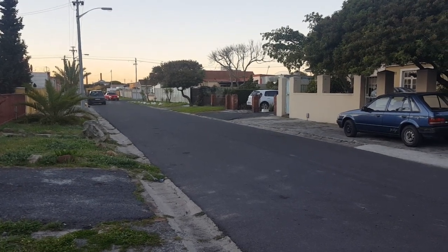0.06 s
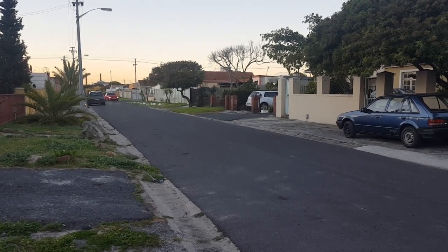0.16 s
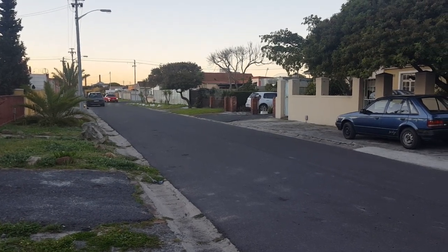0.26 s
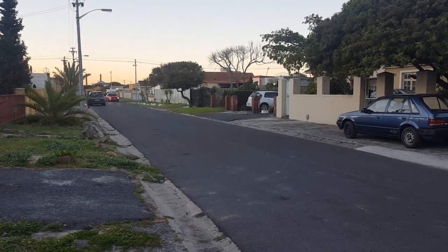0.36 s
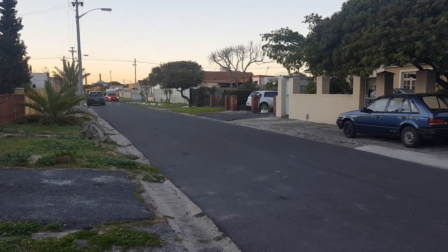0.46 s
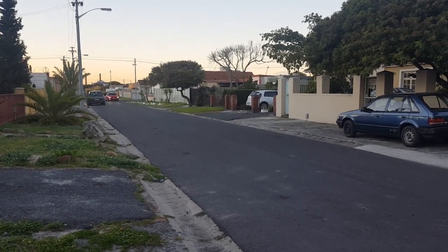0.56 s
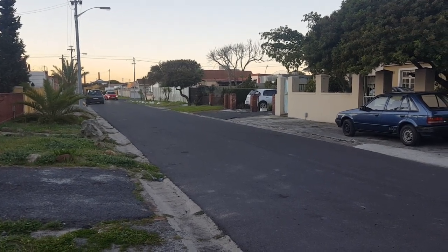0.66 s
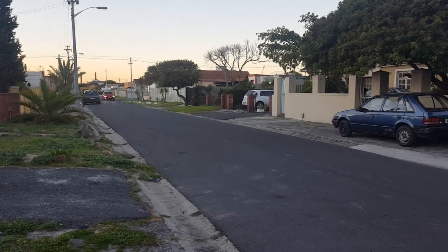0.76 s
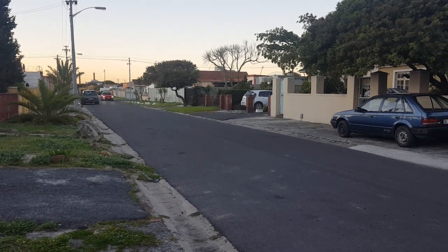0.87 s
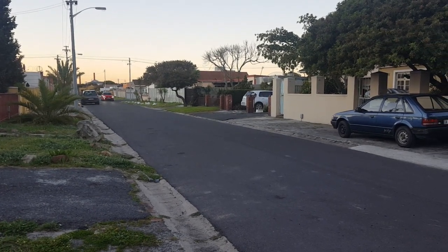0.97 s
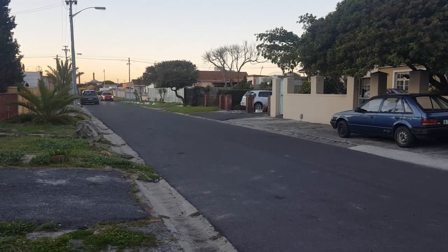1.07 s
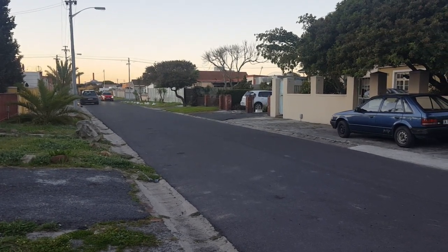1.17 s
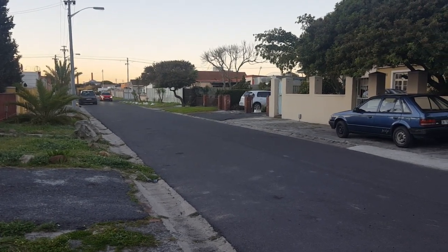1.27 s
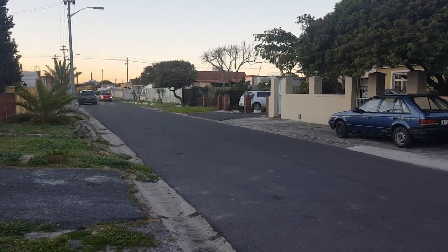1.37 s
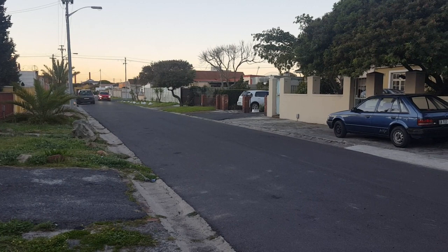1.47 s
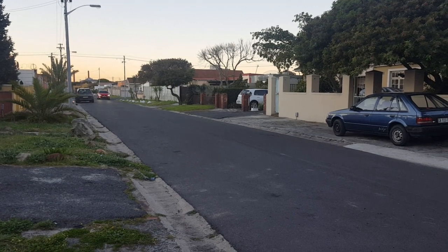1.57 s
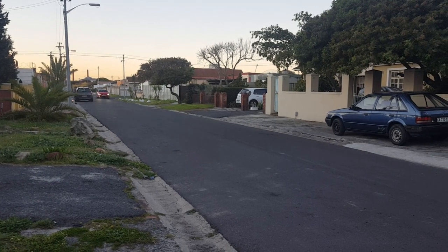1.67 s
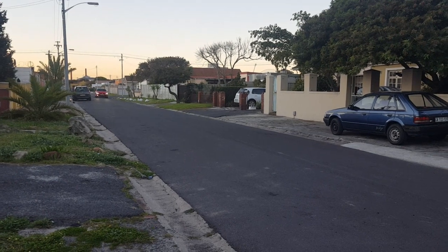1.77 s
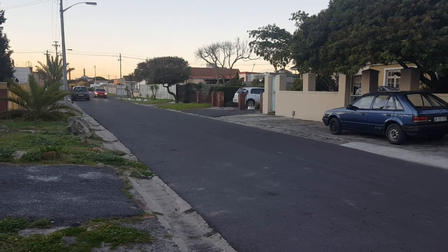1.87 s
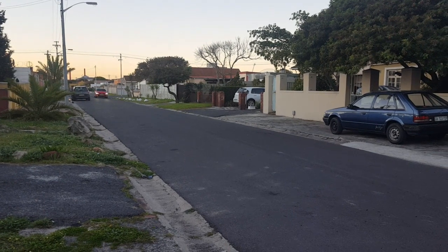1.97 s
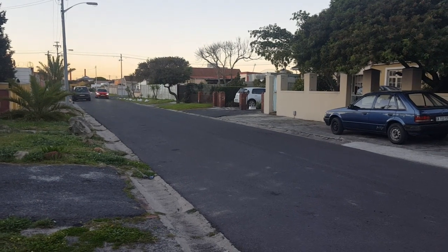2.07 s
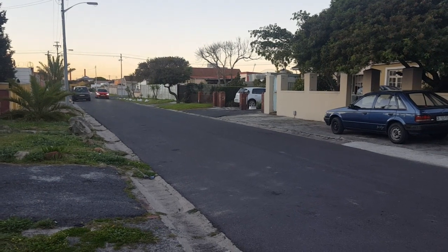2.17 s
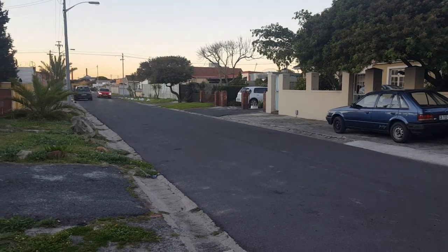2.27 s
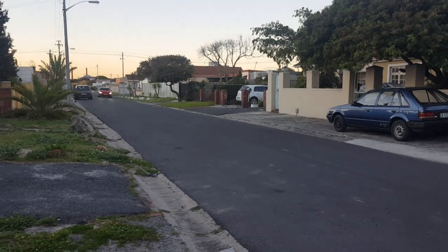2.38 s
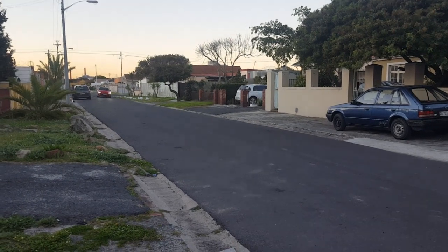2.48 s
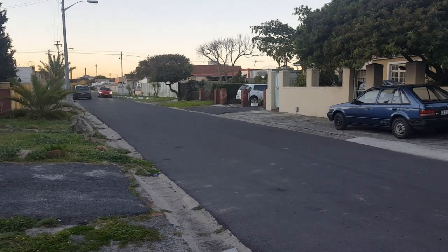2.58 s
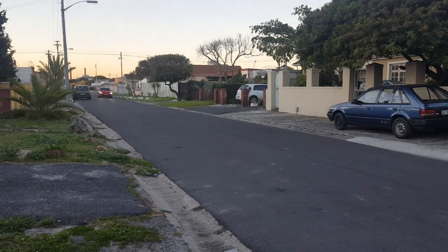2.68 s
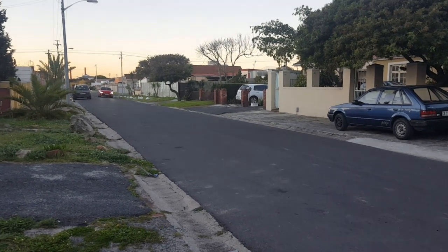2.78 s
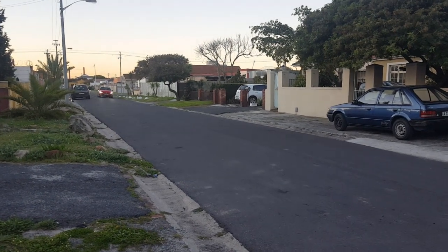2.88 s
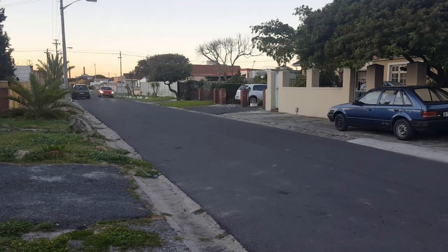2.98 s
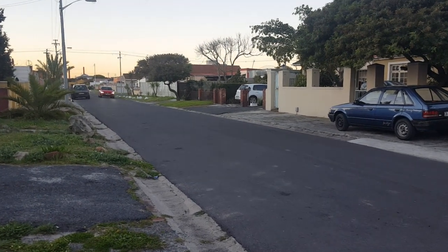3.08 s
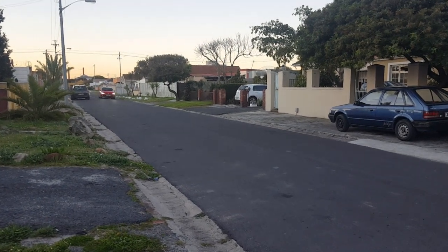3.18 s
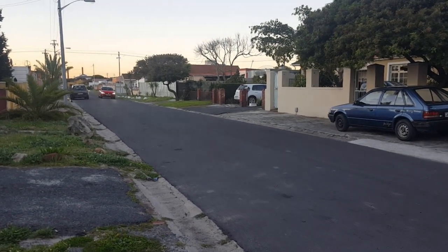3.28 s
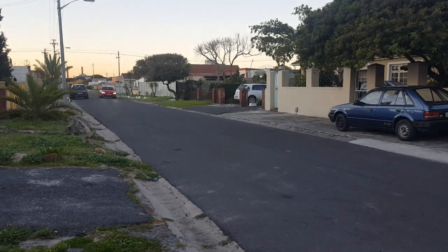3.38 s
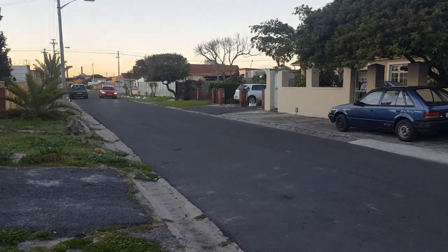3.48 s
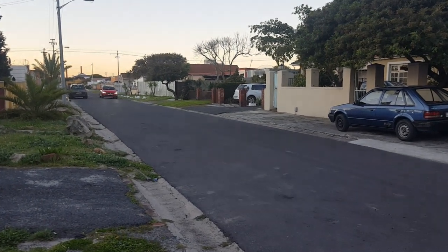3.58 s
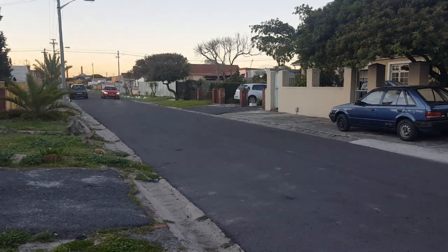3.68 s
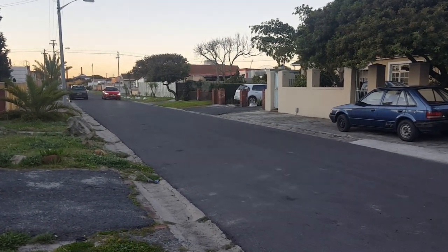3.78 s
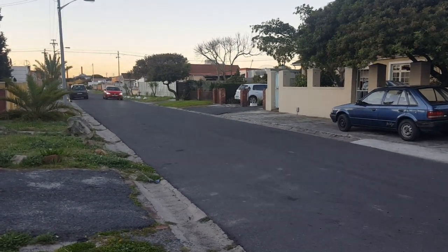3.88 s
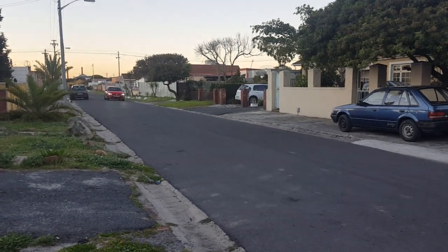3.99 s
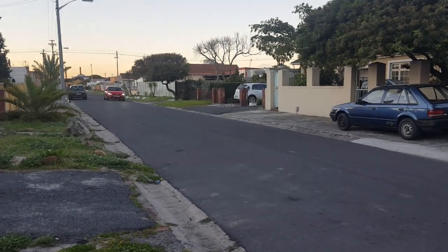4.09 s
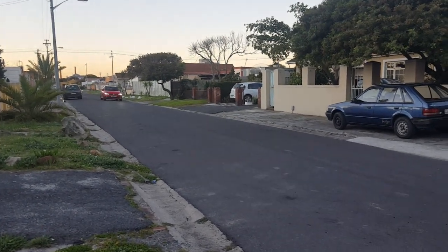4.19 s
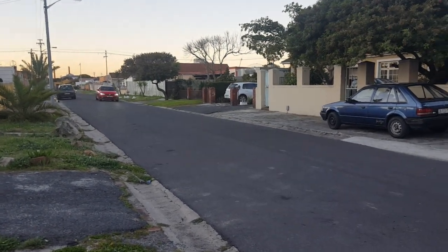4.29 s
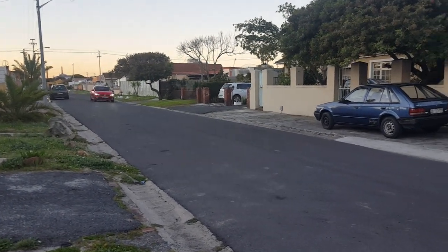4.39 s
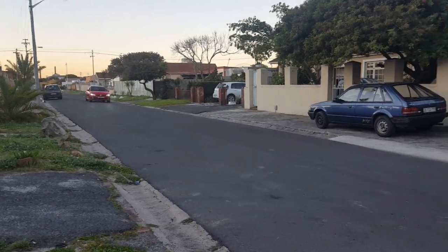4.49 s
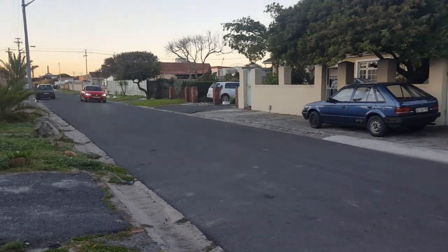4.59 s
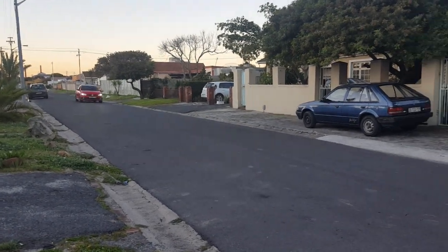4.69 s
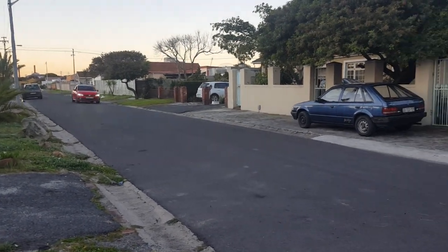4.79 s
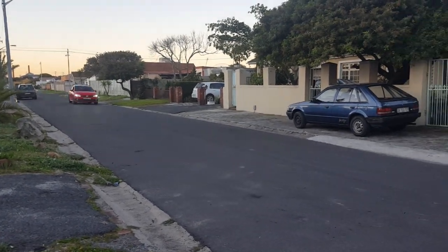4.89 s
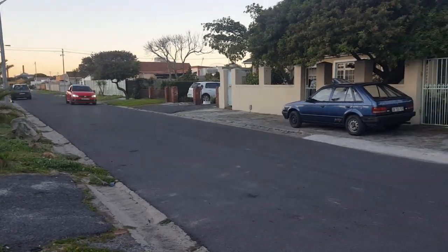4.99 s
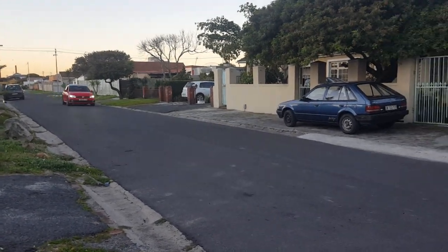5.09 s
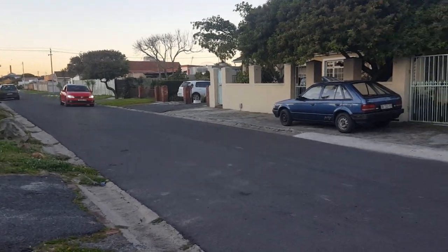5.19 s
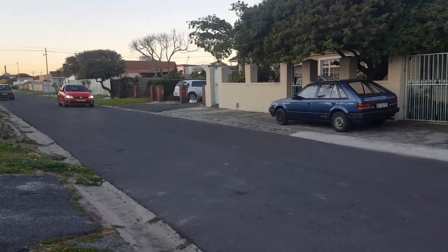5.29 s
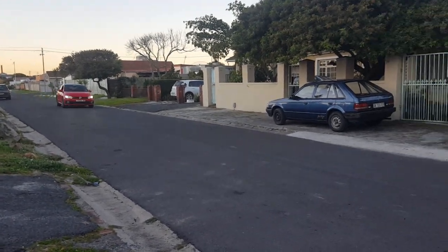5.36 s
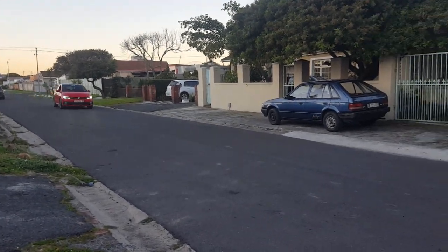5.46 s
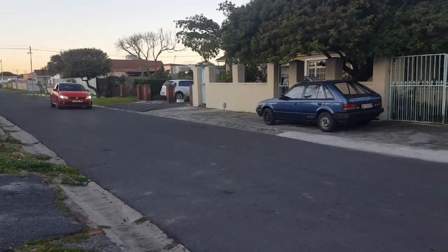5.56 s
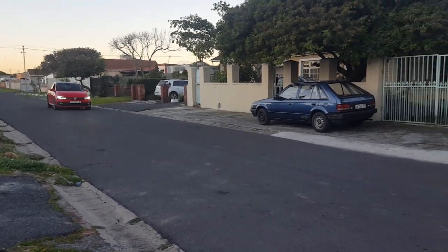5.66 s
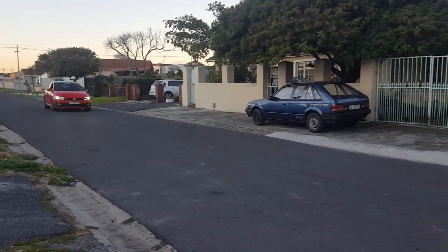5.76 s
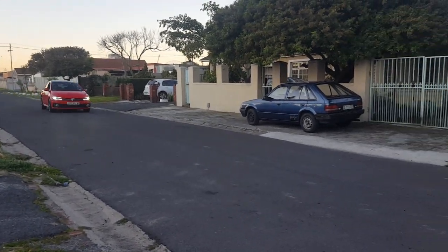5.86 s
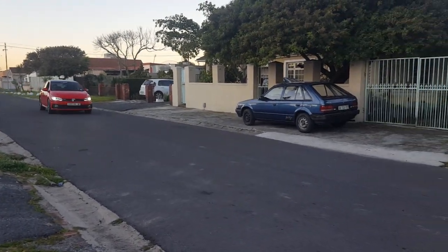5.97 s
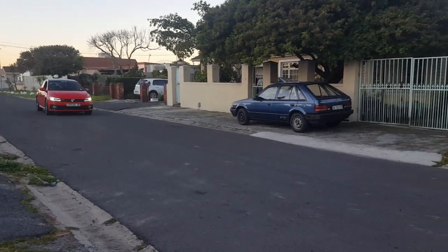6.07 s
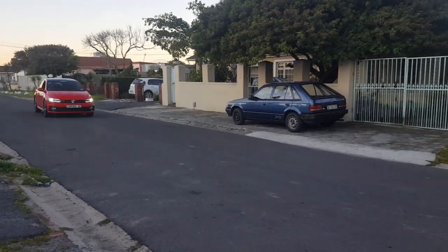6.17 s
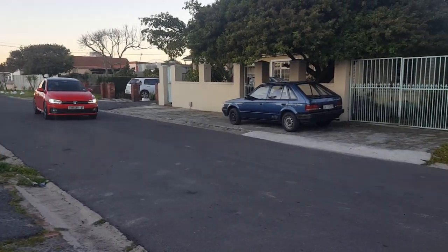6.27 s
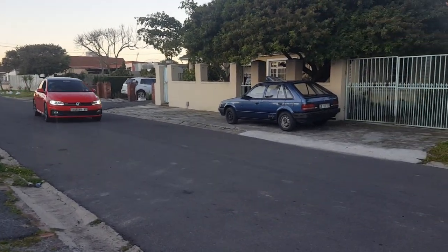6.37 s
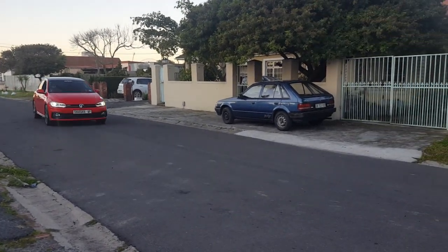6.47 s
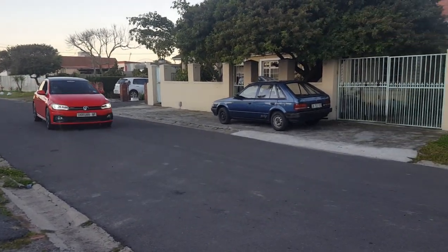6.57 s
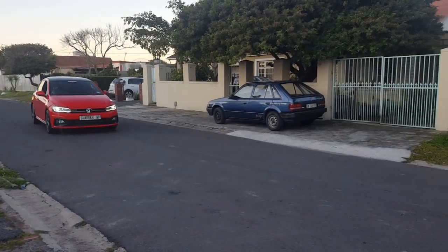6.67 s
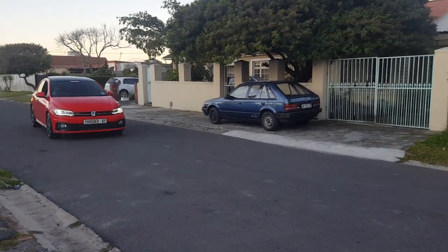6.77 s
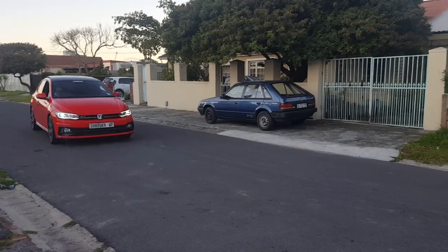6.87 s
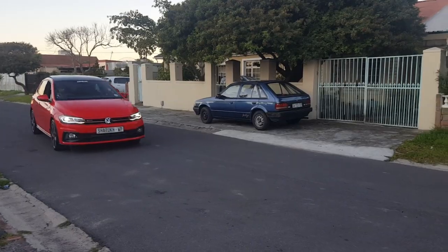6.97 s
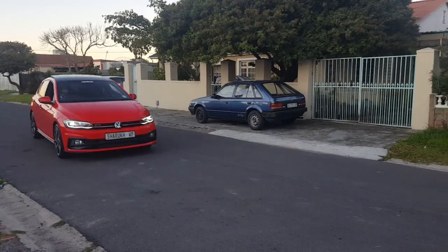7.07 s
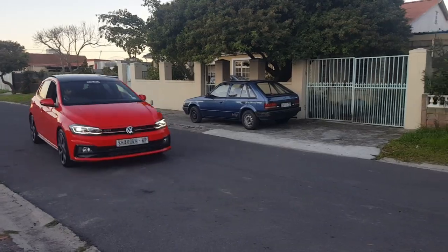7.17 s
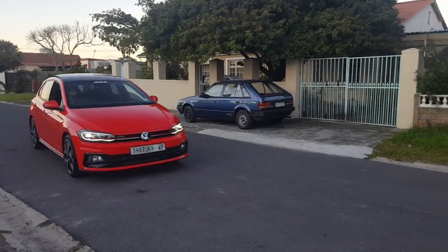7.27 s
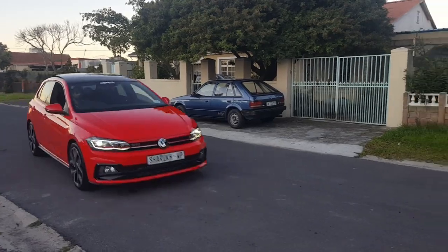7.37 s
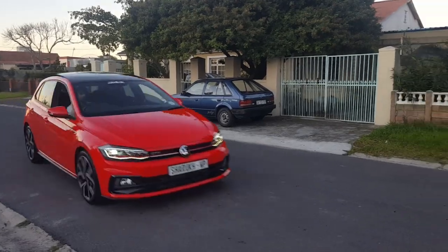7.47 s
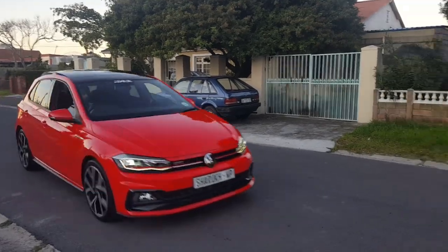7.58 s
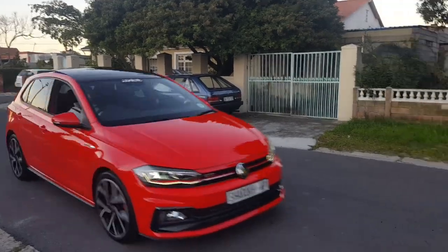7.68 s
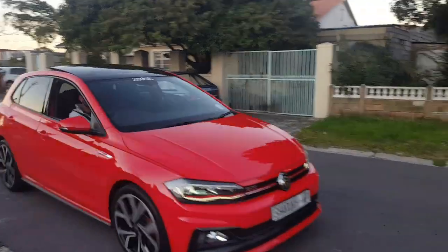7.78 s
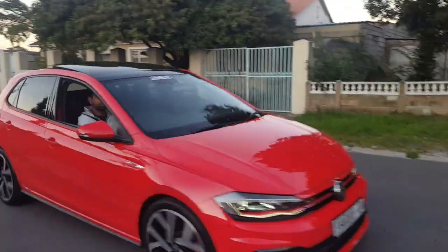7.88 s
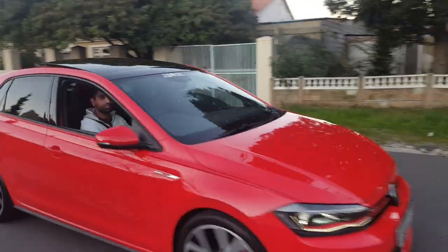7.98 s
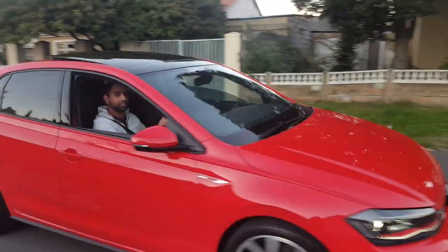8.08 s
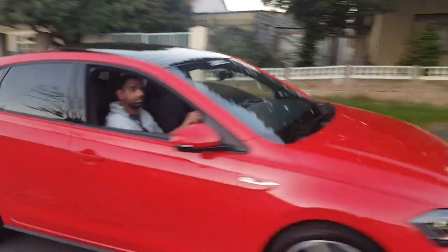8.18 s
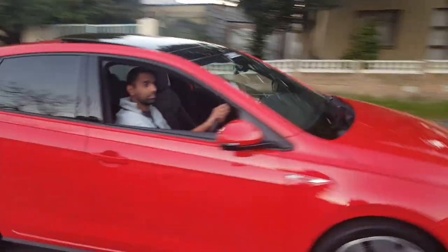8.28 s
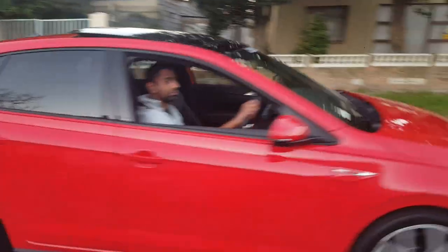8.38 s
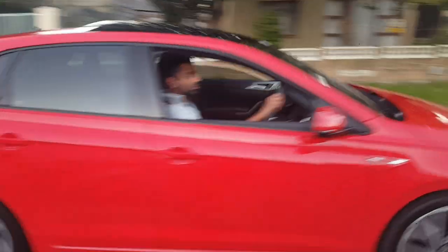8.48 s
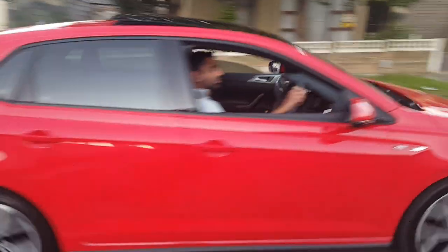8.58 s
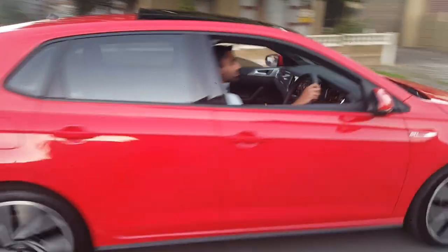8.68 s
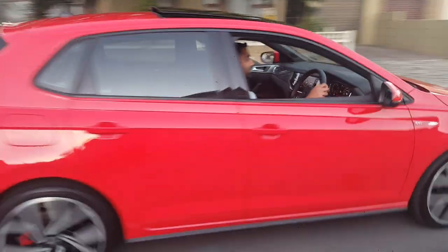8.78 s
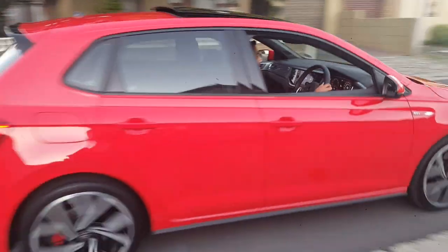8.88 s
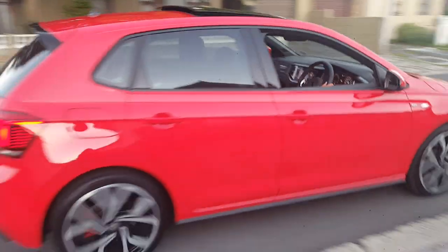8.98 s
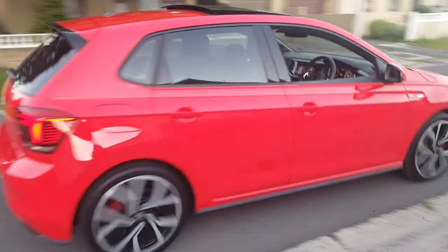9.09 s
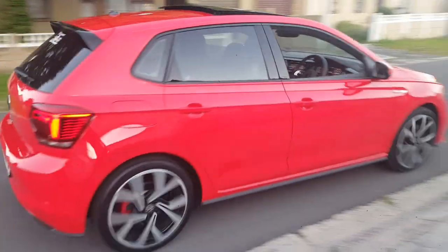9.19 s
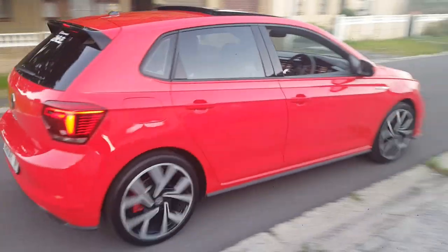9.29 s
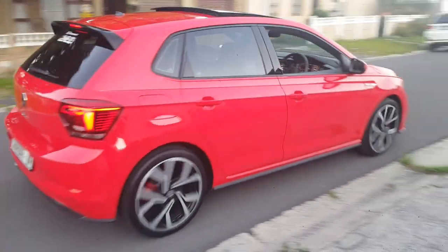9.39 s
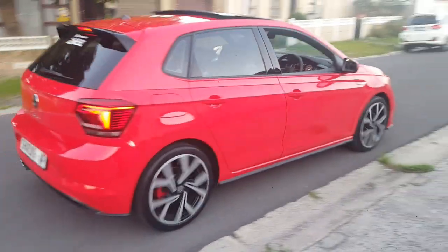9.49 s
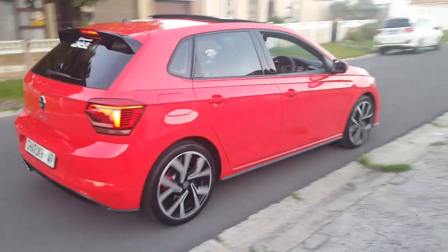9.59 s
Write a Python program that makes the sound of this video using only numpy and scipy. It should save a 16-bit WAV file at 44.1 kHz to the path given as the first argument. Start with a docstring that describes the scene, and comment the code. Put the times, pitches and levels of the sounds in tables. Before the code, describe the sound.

A turbocharged hatchback pulls up a walled street, exhaust booming and burping through shifts, rolls close past with tyre roar and settles into a low, lumpy near-idle burble.

```python
"""A walled suburban street: a turbocharged four-cylinder hatchback pulls up it, shifts with exhaust burps,
slows, rolls close past the listener and settles near idle. Firing pulses and gusts of noise ring the
loud exhaust over booming low orders; shaped noise makes the tyre roar, engine-bay hiss and turbo puffs.
The walls answer with a noise tail; ticks, a thin whistle and a low neighbourhood hum fill the rest."""
import sys
import numpy as np
from scipy import signal
from scipy.fft import rfft, irfft, next_fast_len
from scipy.io import wavfile
from scipy.ndimage import uniform_filter1d, map_coordinates

SR = 44100
rng = np.random.default_rng(int(sys.argv[2]) if len(sys.argv) > 2 else 0)


def store_wav(level_fs):
    """Save 16-bit WAV to argv[1]."""
    pcm = np.round(np.clip(np.atleast_2d(level_fs), -1, 1) * 32767)
    wavfile.write(sys.argv[1], SR, pcm.T.astype(np.int16))


N = 425565
TIME = np.arange(N) / SR  # s

# runs of late-burning charges in the pipe: start t/s, length/s, spacing/s, thud level/dB
BURP_RUNS = [(2.228, .09, .02, -20), (6.481, .24, .047, -13), (8.663, .06, .019, -15.5)]
# the exhaust's resonances: f/Hz, width/Hz, level/dB
PIPE_MODES = [(114.2, 41, -3), (203, 33, -4), (250.5, 21, -4), (297.2, 39, -7.5), (322, 52, -5.5)]
# noise colour of the car far off: f/Hz, level per Hz/dB
RASP_COLOUR = [(300, -21), (380, -3), (440, 1.5), (500, -6), (660, 4), (740, -6.5), (860, -9), (1020, -3.5),
               (1250, -10), (1450, -11.5), (1750, -2.5), (2200, -19), (3000, -47.5)]
# the lowest orders of the firing rate: relative level coasting/dB, level added under throttle/dB
ORDER_LEVELS = [(2.5, -7.5), (1, 2.5), (-1.5, 2), (-1.5, -3.5)]


def amp(db):
    """Decibels to gain."""
    return 10 ** (np.asarray(db) / 20)


def unit(x):
    """Scale to rms 1."""
    return x / np.sqrt(np.mean(x ** 2) + 1e-20)


def along(points, hz):
    """Read (Hz, value) points on a log frequency axis."""
    f, v = np.transpose(points)
    return np.interp(np.log(hz + 1), np.log(f + 1), v)


def curves(rows):
    """One value per sample for each column after the time."""
    s, *cols = np.transpose(rows)
    return [np.interp(TIME, s, c) for c in cols]


def wobble(rate):
    """A random curve of straight segments, rate knots a second."""
    knots = rng.standard_normal(int(N * rate / SR) + 4)
    return np.interp(TIME * rate, np.arange(len(knots)), knots)


def swell(centre_s, half_s):
    """A bell-shaped gain, 1 at its centre and 9 dB down half_s to either side."""
    return amp(-9 * np.minimum(((TIME - centre_s) / half_s) ** 2, 20))


def filtered(x, response):
    """Filter x by a complex response of frequency."""
    size = next_fast_len(N + SR // 2, True)
    return irfft(rfft(x, size) * response(np.fft.rfftfreq(size, 1 / SR)), size)[..., :N]


def rush(spectrum):
    """Stereo noise of rms 1, its ears as alike as each band allows, dying steeply above its last point."""
    # left-right correlation: f/Hz, likeness/1
    likeness = [(200, 0.85), (500, 0.93), (1000, 0.77), (2000, 0.31), (5000, 0.18), (12000, 0.16)]
    top_hz = spectrum[-1][0]

    def mid_side(hz):
        colour = amp(along(spectrum, hz)) / np.maximum(hz / top_hz, 1) ** 10
        turn = np.arccos(np.clip(along(likeness, hz), -1, 1)) / 2
        return colour * [np.cos(turn), np.sin(turn)]

    mid, side = filtered(rng.standard_normal((2, N)), mid_side)
    return unit(np.array([mid + side, mid - side]))


def neighbourhood():
    """A steady low hum of the neighbourhood, made of coloured noise."""
    # colour of the hum: f/Hz, level per Hz/dB
    hum_colour = [(20, -20.5), (50, -3.5), (100, 4.5), (180, 0.5), (260, -15), (330, -8), (420, -25.5),
                  (640, -15), (900, -26), (2000, -33.5), (5000, -53)]
    return amp(-45.5) * rush(hum_colour)


def whistle():
    """A thin sine chirp that slides down and wavers."""
    # t/s, f/Hz, peak level/dB
    glide = [(.68, 5170, -83), (.725, 3650, -65), (.79, 3600, -67), (.81, 3270, -64),
             (.85, 3730, -69), (.91, 3520, -67), (1.1, 3450, -140)]
    hz, level_db = curves(glide)
    phase = 2 * np.pi * np.cumsum(hz + 240 * wobble(600)) / SR
    return amp(level_db) * (TIME > .66) * np.sin(phase)


def ticks():
    """Tiny dry clicks, each a fast-dying burst of noise in one broad band."""
    # small sharp ticks: t/s, peak level/dB, centre f/Hz
    tick_table = [(2.475, -40, 4040), (2.526, -50, 5430), (7.798, -33, 5000), (8.124, -36.5, 7300)]
    out, t = np.zeros(N), np.arange(SR // 20) / SR
    for s, db, hz in tick_table:
        burst = rng.standard_normal(len(t)) * amp(-60 * t / 0.015)
        burst = signal.lfilter(*signal.iirpeak(hz, 2.5, SR), burst)
        burst = signal.lfilter(*signal.butter(4, 8000, fs=SR), burst)
        out[round(s * SR):][:len(t)] += amp(db) * burst / np.abs(burst).max()
    return out


def walls(x):
    """The street's diffuse answer: a tail of noise, different at each ear, that dies sooner in the treble."""
    # decay by 60 dB: f/Hz, time/s
    decay = [(100, 1), (1000, 0.75), (8000, 0.25)]
    hz, t, z = signal.stft(rng.standard_normal((2, SR // 2)), SR, nperseg=256)
    dying = z * amp(-60 * t / along(decay, hz)[:, None])
    tail = signal.istft(dying, SR, nperseg=256)[1]
    return signal.fftconvolve(x[None], tail / np.linalg.norm(tail[0]), axes=1)[:, :N]


def placed(pair):
    """The car's bearing delays one ear against the other."""
    # how far the left ear lags the right: t/s, lag/samples
    ear_lag = [(0, -5), (3, -5.5), (5, -7.5), (6.3, -8), (7.2, -5), (7.75, 0), (8.25, 6), (8.75, 8),
               (9.4, 3.5)]
    lag, = curves(ear_lag)
    return np.array([map_coordinates(ear, [np.arange(N) - side * lag / 2], order=3)
                     for ear, side in zip(pair, (1, -1))])


def nearness():
    """The car's least distance over its present one as it rolls by."""
    pass_s, width_s = 7.8, 0.68  # nearest moment; time to roll as far as it then is from the listener
    return 1 / np.hypot(1, (TIME - pass_s) / width_s)


def stages():
    """How the colours of roar and hiss turn with distance: 0 far off, 1 approaching, 2 alongside."""
    # t/s, roar stage/1, hiss stage/1
    stage_table = [(4.2, 0.4, 0), (5.3, 1.26, 0.4), (6.9, 0.85, 0.5), (7.7, 1.21, 2), (8.7, 1.5, 2)]
    return curves(stage_table)


def shares(stage):
    """Equal-power weights of the far, approaching and alongside colours."""
    return [np.sqrt(np.clip(1 - abs(stage - k), 0, 1)) for k in range(3)]


def pulses(phase, scatter_db):
    """One sharp pulse of uneven size per firing, the sum of orders 5 to 36."""
    train = (np.sin(36.5 * phase) - np.sin(4.5 * phase)) / (2 * np.sin(phase / 2) + 1e-12)
    firing = np.round(phase / (2 * np.pi)).astype(int)
    return train * amp(scatter_db * rng.standard_normal(firing.max() + 1))[firing]


def fine_hiss():
    """The finest hiss, which carries only a short way and so peaks as the car passes."""
    # colour: f/Hz, level per Hz/dB
    fizz_colour = [(6000, -20), (8000, 0), (10000, -8), (11800, 0), (15700, -4), (17000, -12)]
    return amp(-59.8) * nearness() * rush(fizz_colour)


def bay_hiss():
    """The rush of the engine bay: gritty noise that turns from its far colour to its near one."""
    # relative level: t/s, level/dB
    hiss_level = [(0, -71.5), (1.1, -67), (2, -60), (2.8, -61.5), (3.8, -53.5), (5.8, -50.5), (7.15, -47),
                  (7.85, -40), (8.5, -45.5), (9.65, -50)]
    # colour far off: f/Hz, level per Hz/dB
    far_colour = [(1700, -17), (2200, 4.5), (2600, 1.5), (3200, 3.5), (4800, -3), (5400, -7.5),
                  (6800, -10.5), (7400, -15), (8500, -31), (11000, -61.5)]
    # colour approaching: f/Hz, level per Hz/dB
    mid_colour = [(1700, -32), (2300, 1.5), (3000, -6.5), (3900, 0.5), (4800, -3), (5200, -9), (5900, -1),
                  (6900, -10.5), (8000, -21.5), (11000, -44.5)]
    # colour alongside: f/Hz, level per Hz/dB
    near_colour = [(1300, -11), (2100, 2.5), (2650, -1.5), (2850, 0), (3100, -3), (4400, -6), (5900, -8),
                   (6700, -17.5), (8700, -26), (11000, -59)]
    hiss_db, = curves(hiss_level)
    far, mid, near = shares(stages()[1])
    hiss = far * amp(2.5) * rush(far_colour)
    hiss = hiss + mid * amp(2.5) * rush(mid_colour)
    hiss = hiss + near * amp(3.0) * rush(near_colour)
    grit = amp(1.3 * wobble(900))
    return grit * amp(hiss_db + 1.65) * hiss


def engine_rasp(rate, phase):
    """Firing pulses come mostly by way of the walls, so harmonics fade in and out as they glide."""
    darker = lambda hz: amp(along(RASP_COLOUR, hz) - hz / 250)
    direct = filtered(pulses(phase, scatter_db=1.0) * np.sqrt(rate), darker)
    scattered = walls(direct)
    return unit(.5 * direct + 0.42 * scattered + scattered.mean(axis=0))


def roar(rate, phase):
    """Far off the engine's rasp leads, then the tyres' roar; each firing throbs lightly through it."""
    # relative level of tyre roar and rasp: t/s, level/dB
    roar_level = [(0.0, -61.5), (1.56, -48), (2.31, -43), (2.47, -46), (3.81, -37.5), (3.89, -40),
                  (5.21, -34), (5.45, -30), (6.21, -33.5), (6.67, -31), (7.71, -30.5), (8.82, -43.5),
                  (9.49, -45.5), (9.65, -46)]
    # colour of the tyres approaching: f/Hz, level per Hz/dB
    tyre_colour = [(280, -13), (400, -2.5), (540, -2.5), (622, 3.5), (700, -3), (790, -9), (950, 0.5),
                   (1100, 0), (1350, -4), (1700, -6), (2200, -15), (3200, -54)]
    # colour alongside: f/Hz, level per Hz/dB
    close_colour = [(280, -16.5), (400, -4), (540, -14.5), (700, 1), (920, 5), (1300, -8), (1600, 6.5),
                    (1850, -6.5), (2200, -6), (3500, -28)]
    roar_db, = curves(roar_level)
    rasp = engine_rasp(rate, phase)
    far, mid, near = shares(stages()[0])
    mix = far * (amp(-1.96) * rush(RASP_COLOUR) + amp(-3.5) * rasp)
    mix = mix + mid * (amp(0.6) * rush(tyre_colour) + amp(-12.0) * rasp)
    mix = mix + near * amp(1.0) * rush(close_colour)
    throb = 1 + 0.081 * np.cos(phase)
    return amp(roar_db + 1.1 * wobble(14)) * throb * mix


def whine():
    """The engine bay's narrow wavering whine shows while the car is alongside."""
    phase = 2 * np.pi * np.cumsum(2860 + 70 * wobble(400)) / SR
    return amp(-50) * swell(8.45, .25) * np.sin(phase)


def turbo():
    """Boost air escapes in short soft puffs of noise."""
    # air releases: t/s, level/dB, half length/s
    puff_table = [(3.42, -49.5, .065), (5.12, -52.5, .09), (6.82, -49.5, .11)]
    # f/Hz, level per Hz/dB
    air_colour = [(1200, -12), (2600, 0), (4000, -5), (7200, -10), (9500, -33), (15000, -35)]
    level = sum(amp(db) * swell(s, half) for s, db, half in puff_table)
    return level * rush(air_colour)


def mode(hz, centre, width, db):
    """Complex response of one resonance."""
    return amp(db) * 1j * hz * width / (centre ** 2 - hz ** 2 + 1j * hz * width)


def pipe(hz):
    """The exhaust's standing waves and the silencer's loss."""
    # the silencer's gain: f/Hz, level/dB
    silencer = [(30, -1.5), (80, 6.5), (330, 1), (390, -18.5), (500, -23.5), (800, -16), (3000, -37)]
    return sum(mode(hz, *row) for row in PIPE_MODES) * amp(along(silencer, hz))


def reflections(hz, trip, bounce):
    """A pulse runs back and forth in the pipe (trip in s) and leaves a little on every trip."""
    delay = np.exp(-2j * np.pi * hz * trip)
    return (bounce + delay) / (1 + bounce * delay)


def burps():
    """Unburnt charges go off in the pipe in fading runs of dull thuds, each with a rough blast of gas."""
    fall_db_per_s, scatter_s = 14, .002
    rasp_db, rasp_s, rasp_hz = -20, .012, 700  # the blast's gain, decay time and low-pass corner
    kicks = np.zeros(N)
    for s, length, spacing, db in BURP_RUNS:
        age = np.arange(0, length, spacing)
        times = s + age + scatter_s * rng.standard_normal(len(age))
        kicks[np.round(times * SR).astype(int)] = amp(db - fall_db_per_s * age)
    thud = lambda hz: (pipe(hz) + mode(hz, 160, 70, -5)) / (1 + 1j * hz / 300)
    thud_peak = np.abs(irfft(thud(np.fft.rfftfreq(SR, 1 / SR)))).max()
    blast = signal.lfilter([1], [1, -np.exp(-1 / (rasp_s * SR))], kicks)
    rough = signal.lfilter(*signal.butter(4, rasp_hz, fs=SR), blast * rush(RASP_COLOUR)[0])
    return filtered(kicks, thud) / thud_peak + amp(rasp_db) * rough


def ignition():
    """Gain of the boom, which dips by a few dB during each run of burps."""
    dip_db, ramp_s = -4, 0.026
    dip = sum(1.0 * (TIME > s) * (TIME < s + length) for s, length, spacing, db in BURP_RUNS)
    return amp(dip_db * uniform_filter1d(dip, size=int(ramp_s * SR)))


def throttle(rate):
    """The throttle opens (towards 1) while the revs climb and is shut (0) while they fall, smoothed."""
    full_pull, smooth_s = 10.4, 0.37  # rise of the firing rate at full throttle, Hz per s; averaging time
    climb = np.clip(np.gradient(rate) * SR / full_pull, 0, 1)
    return uniform_filter1d(climb, size=int(smooth_s * SR))


def order_wave(k, rate, phase, pull):
    """One order booms at its pitch, beats against a wall's echo at a distance and swells in honks."""
    # the boom, set by throttle and distance: t/s, relative level/dB
    boom_level = [(0, -55), (.7, -40), (1.8, -36), (2.1, -31), (2.38, -37.5), (2.6, -37.5), (2.9, -39),
                  (3.45, -29), (4.45, -29.5), (5.1, -30), (5.8, -33), (6.15, -24.5), (6.45, -24.5),
                  (6.66, -28), (7.45, -22.5), (8.42, -19.5), (8.6, -30.5), (8.9, -32.5), (9.3, -22),
                  (9.65, -29)]
    # how strongly an order booms at its pitch: f/Hz, relative level/dB
    boom_tone = [(30, -18.5), (55, -12.5), (80, -3.5), (115, -1), (150, -7), (205, -10), (230, -12.5),
                 (290, -11), (320, -13), (350, -13), (400, -21.5), (470, -15)]
    # drones or honks as one order swells: t/s, half length/s, order/1, relative level/dB
    honk_table = [(1.467, 0.054, 1, -34.5), (2.09, 0.065, 2, -33.5), (2.55, 0.13, 1, -34),
                  (2.739, 0.082, 2, -33), (3.153, .15, 1, -36.5), (3.606, 0.18, 2, -32.5),
                  (3.996, 0.055, 2, -28.5), (4.642, 0.16, 3, -29.5), (5.04, 0.12, 3, -32),
                  (5.13, .07, 1, -22.5), (5.418, 0.13, 2, -31.5), (6.118, .13, 1, -23.5),
                  (6.344, 0.26, 2, -21), (6.81, 0.062, 4, -22), (7.11, .15, 1, -22.5),
                  (7.463, 0.19, 2, -18.5), (7.89, 0.084, 4, -24.5)]
    echo_share, lost_at = .95, .4  # echo over direct sound far off; nearness at which the echo is drowned
    doppler, wander, drifts_per_s = .02475, .35, 7  # echo's shift as share of pitch; random drift, radians
    coast_db, pull_db = ORDER_LEVELS[k - 1]
    level_db = curves(boom_level)[0] + along(boom_tone, k * rate) + coast_db + pull_db * pull
    share = echo_share * np.clip(1 - nearness() / lost_at, 0, 1)
    beat = doppler * k * phase + wander * wobble(drifts_per_s)
    fading = abs(1 + share * np.exp(1j * beat)) / np.hypot(1, share)
    honks = sum(amp(db) * swell(s, half) for s, half, order, db in honk_table if round(order) == k)
    level = np.sqrt(2) * np.hypot(amp(level_db) * fading, honks)
    # the lowest resonance turns the wave's phase as the pitch crosses it
    return level * np.cos(k * phase + np.angle(mode(k * rate, *PIPE_MODES[0])))


def exhaust(rate, phase):
    """Firing pulses and gusts of gas ring the pipe; the four lowest orders boom and fade on their own."""
    # the pipe's burble, strongest on a closed throttle: t/s, relative level/dB
    burble_level = [(0, -53.5), (1.5, -47), (3.05, -49.5), (3.5, -45), (4.5, -45), (5.8, -30), (6.2, -34.5),
                    (7.1, -28), (7.8, -24), (8.4, -24.5), (8.62, -34.5), (8.92, -39), (9.3, -26.5),
                    (9.65, -26)]
    gust_slow, gust_fast = 1.1, 0.41  # how sharply the gas bunches at slow and fast firing
    burble_db, = curves(burble_level)
    pull = throttle(rate)
    boom = sum(order_wave(k, rate, phase, pull) * amp(1.7 * wobble(35))
               for k in range(1, len(ORDER_LEVELS) + 1))
    tube = lambda hz: pipe(hz) * reflections(hz, trip=.0075, bounce=.7)
    ring = filtered(pulses(phase, scatter_db=3.0) * np.sqrt(rate / 30), tube)
    # slow firings stay distinct, fast flow is mostly turbulence
    flow = np.clip(rate / 90, 0, 1)
    # each firing also blows a gust of turbulent gas down the pipe
    gust = np.exp((gust_slow + (gust_fast - gust_slow) * flow) * (np.cos(phase) - 1))
    gas = unit(filtered(gust * rng.standard_normal(N), pipe))
    burble = amp(-3.0 - 2.4 * flow) * ring + amp(-7.5 + 10.26 * flow) * gas
    return ignition() * boom + amp(burble_db) * burble


def scene():
    """The car in the street and the walls' answer to its exhaust, over a low hum of the neighbourhood."""
    # pull in first gear, shift, pull in second, lift off, blip down a gear, coast to idle:
    # t/s, firing rate f/Hz
    firing_rate = [(0, 52), (.4, 49.3), (2.03, 109.7), (2.27, 112), (2.36, 84), (2.65, 80.7), (3.7, 102.5),
                   (4.75, 117.6), (4.9, 116), (5.2, 103.5), (5.35, 70), (5.62, 68), (5.9, 103), (6.3, 92),
                   (7.2, 67.4), (8, 44.4), (8.58, 29.6), (9.15, 28.3), (9.65, 30.3)]
    rate, = curves(firing_rate)
    phase = 2 * np.pi * np.cumsum(rate) / SR
    tailpipe = exhaust(rate, phase) + burps()
    rolling = roar(rate, phase) + bay_hiss() + fine_hiss()
    louder_right = amp(0.43 * np.array([[-1], [1]]))
    car = placed(tailpipe + louder_right * rolling + turbo() + whine())
    echo = amp(-21) * walls(tailpipe)
    return car + echo + ticks() + whistle() + neighbourhood()


def record(dry):
    """Nothing is kept above the band limit of 15750 Hz."""
    return filtered(dry, lambda hz: hz < 15750)


dry = scene()
out = record(dry)
store_wav(out)
```